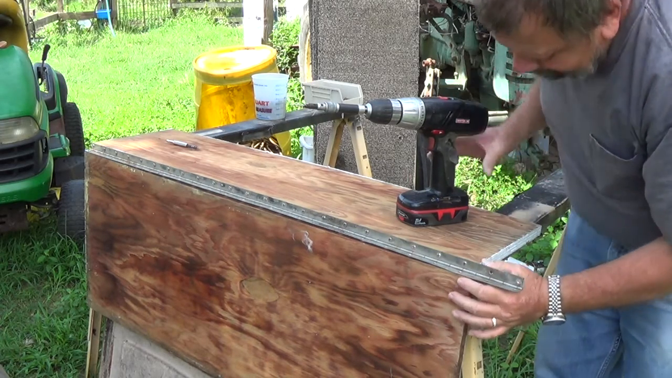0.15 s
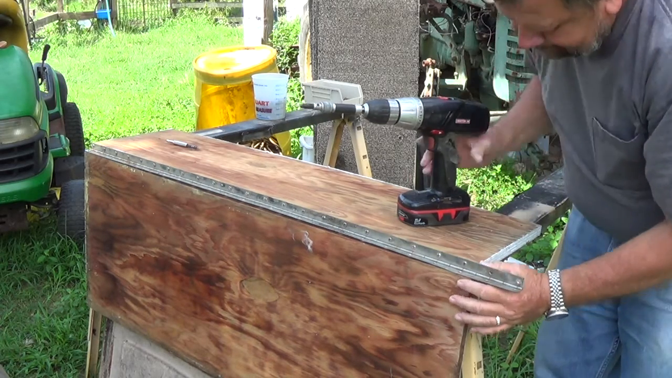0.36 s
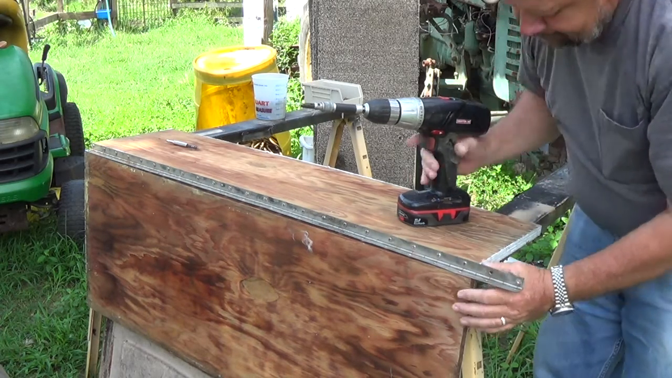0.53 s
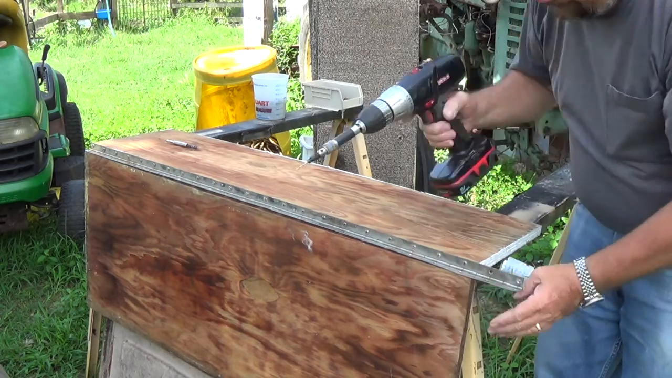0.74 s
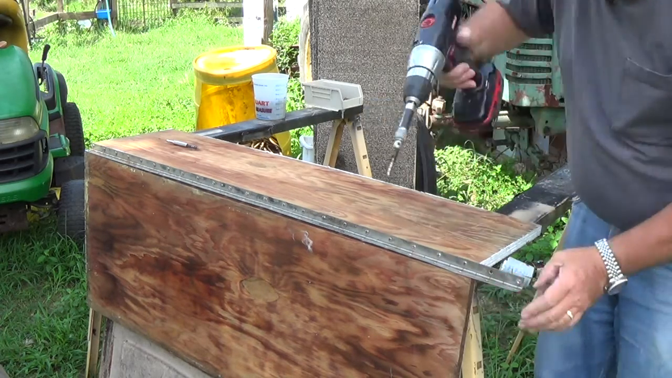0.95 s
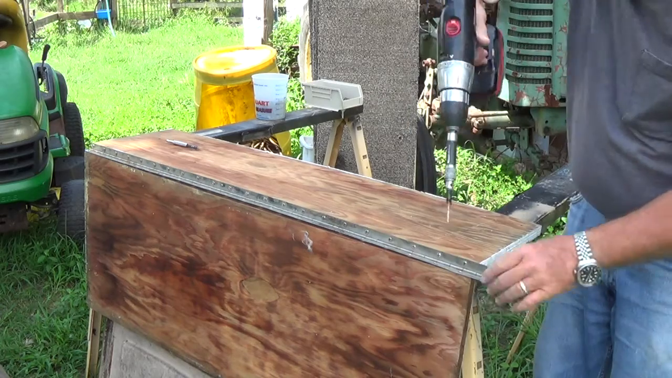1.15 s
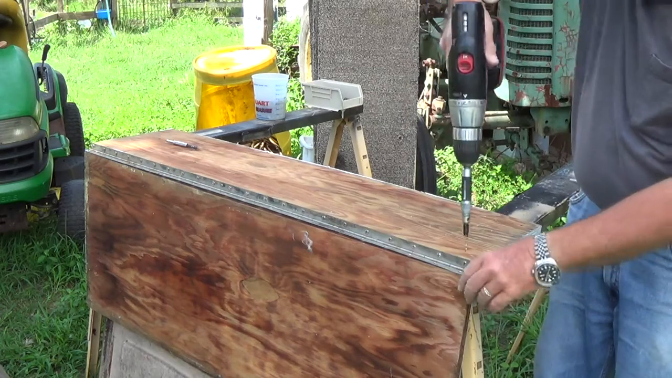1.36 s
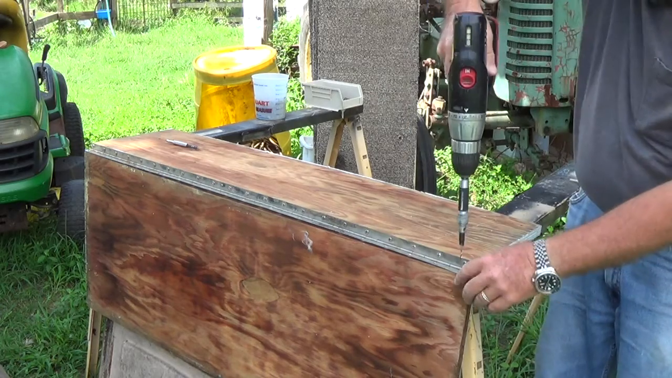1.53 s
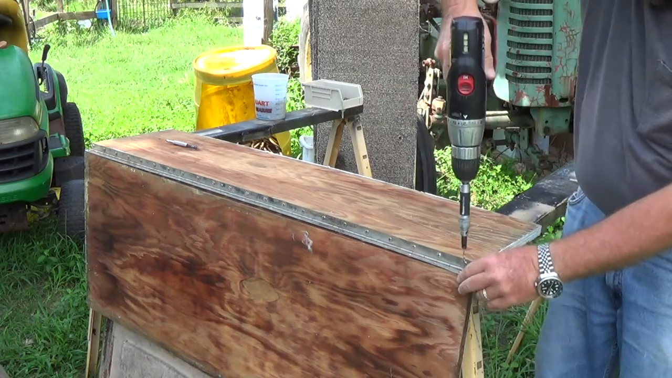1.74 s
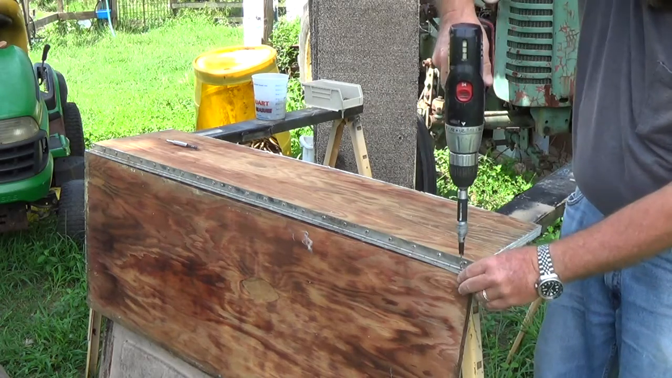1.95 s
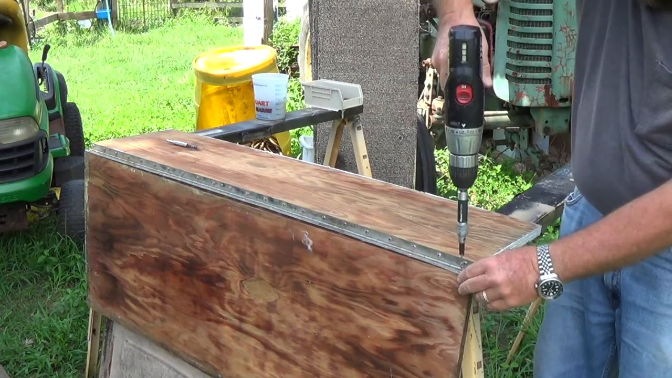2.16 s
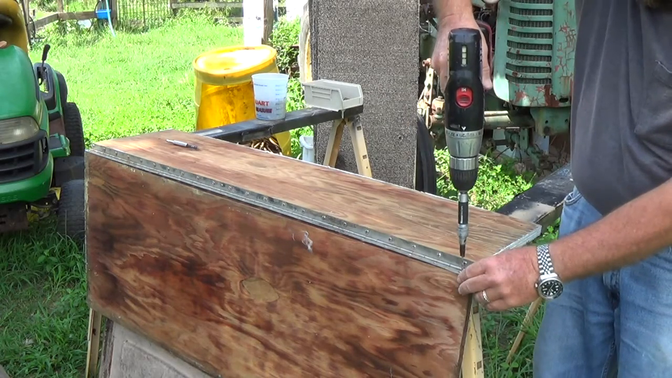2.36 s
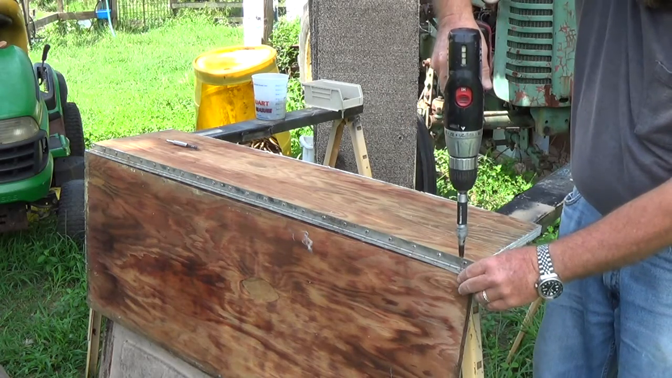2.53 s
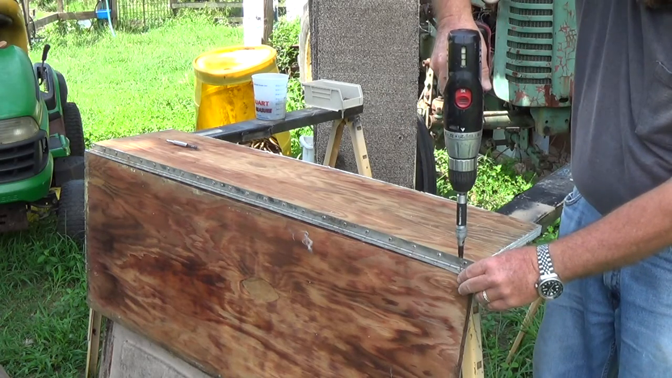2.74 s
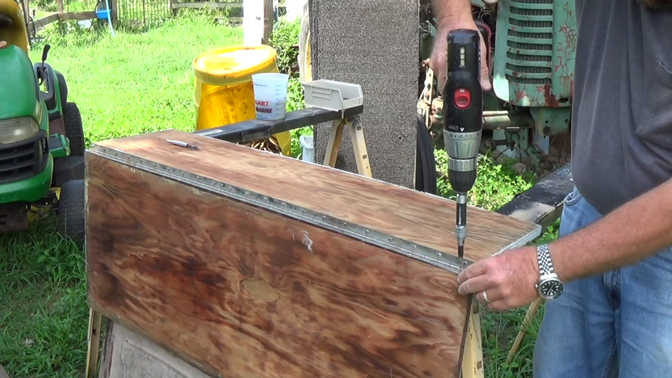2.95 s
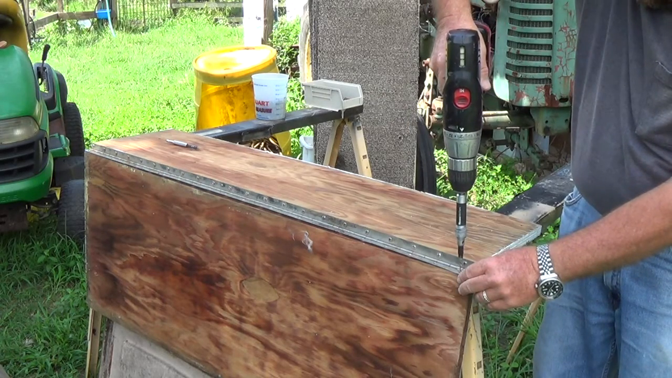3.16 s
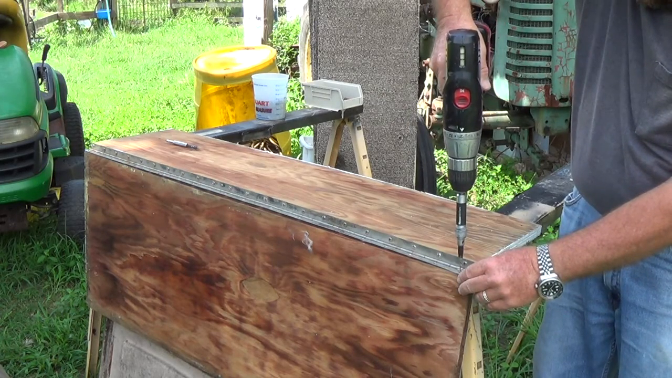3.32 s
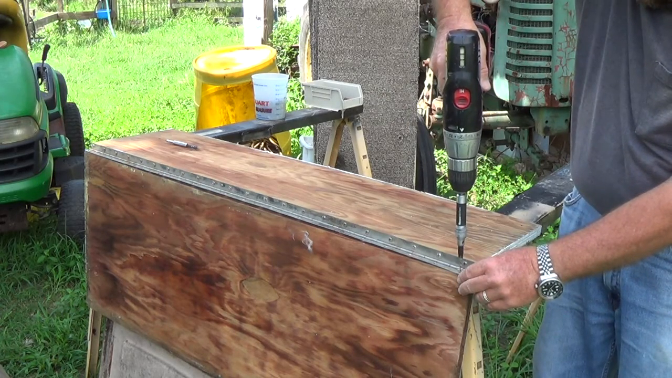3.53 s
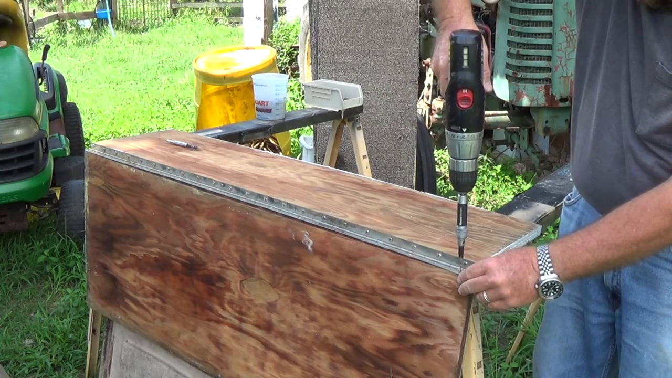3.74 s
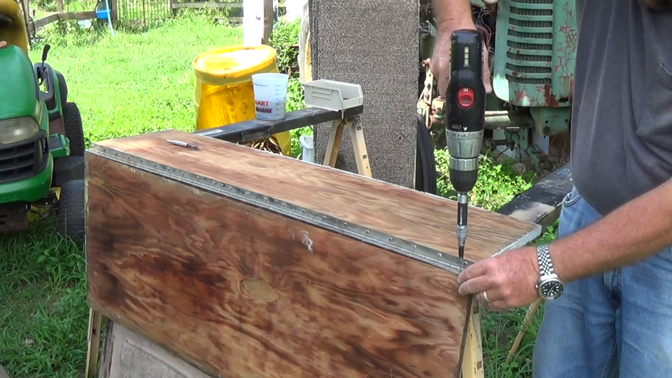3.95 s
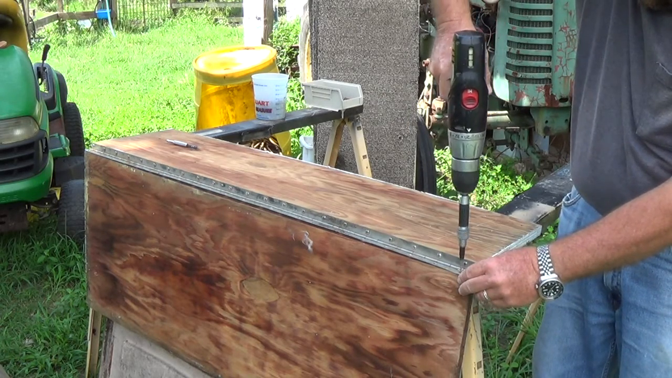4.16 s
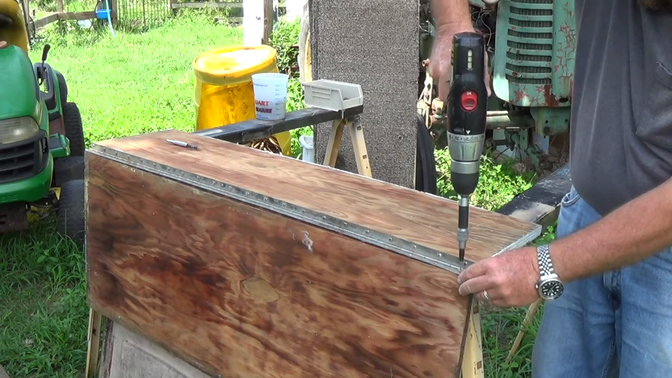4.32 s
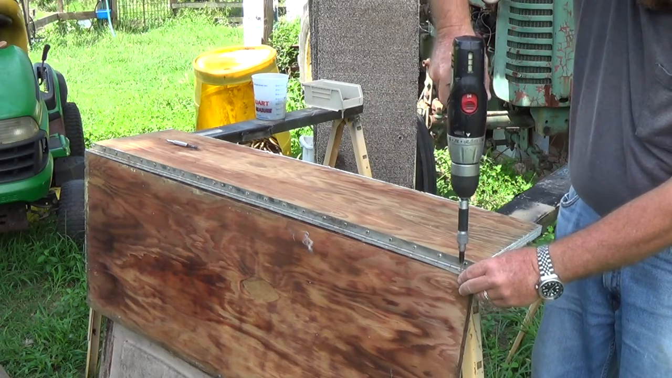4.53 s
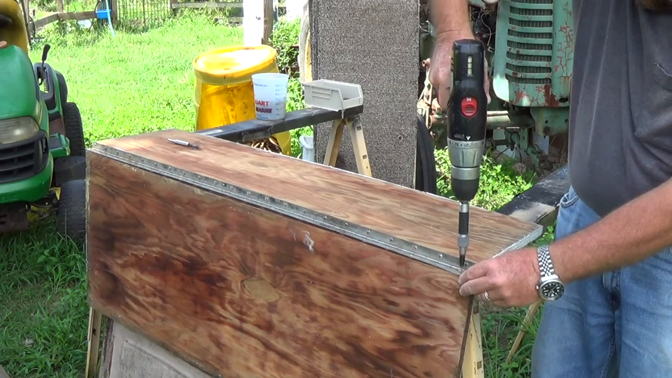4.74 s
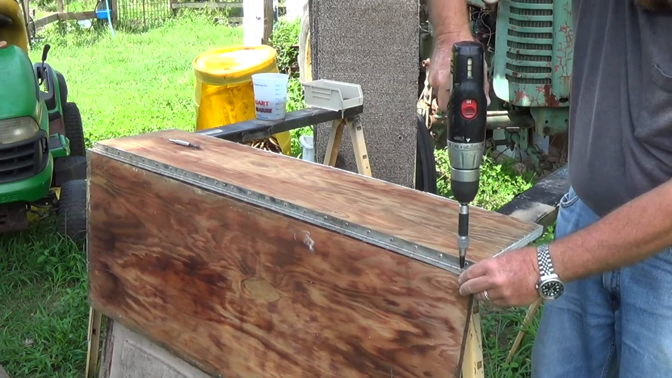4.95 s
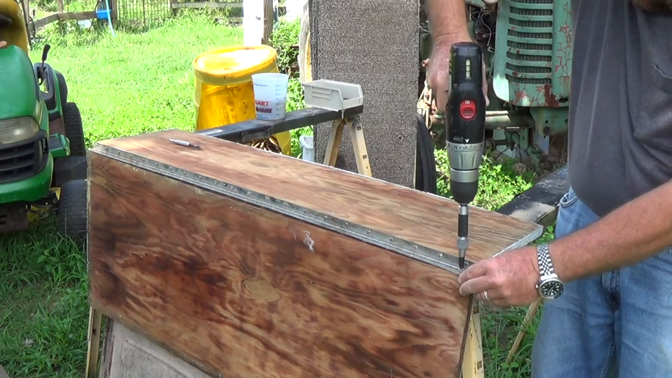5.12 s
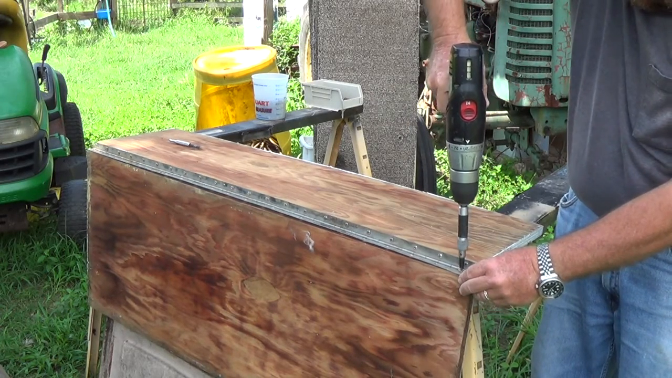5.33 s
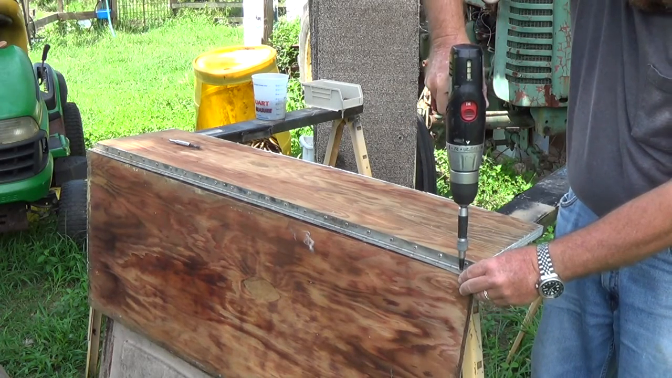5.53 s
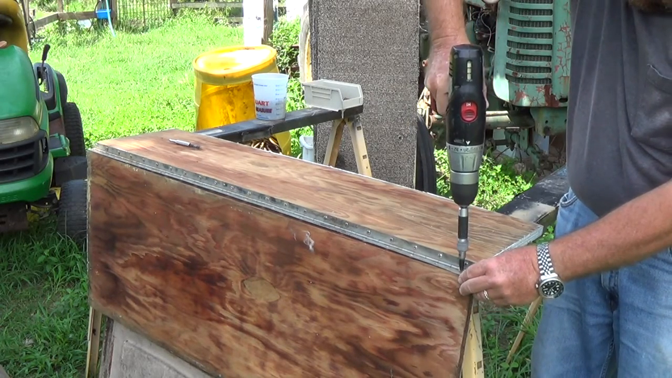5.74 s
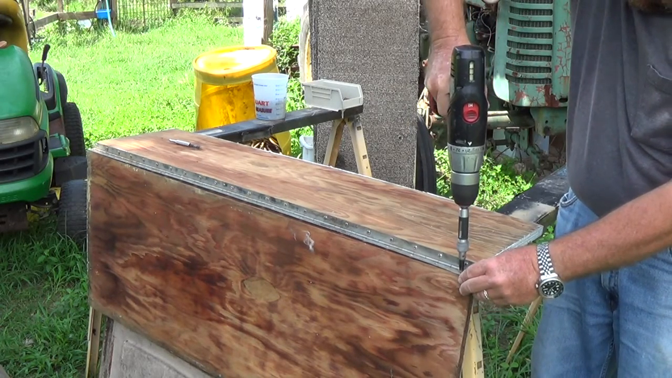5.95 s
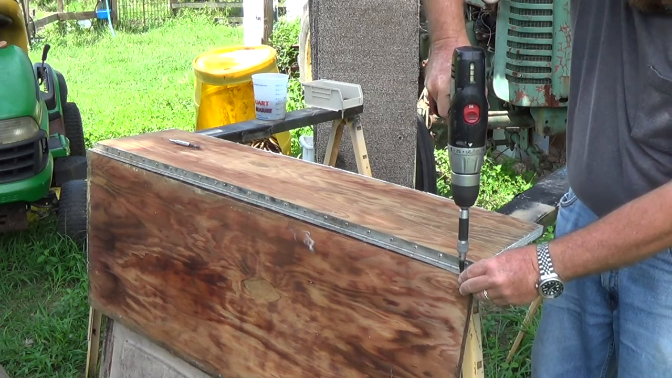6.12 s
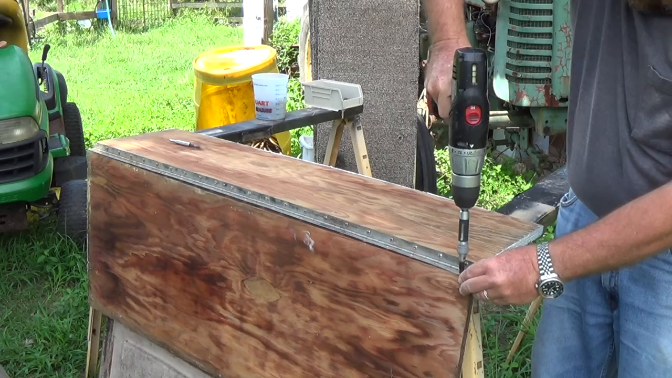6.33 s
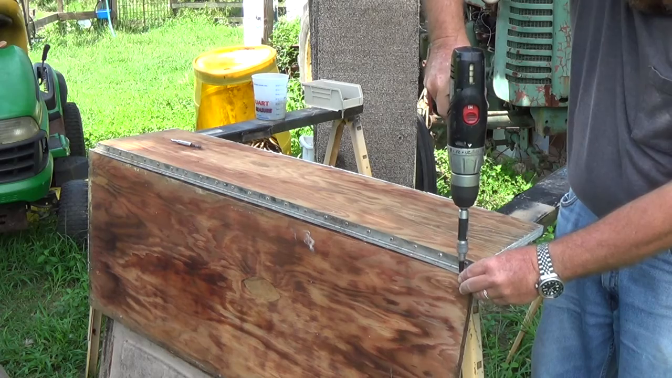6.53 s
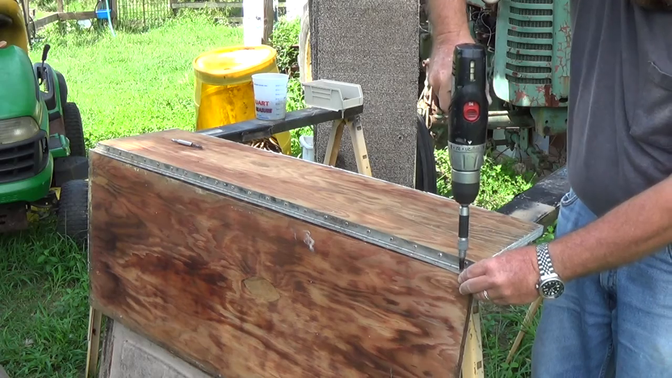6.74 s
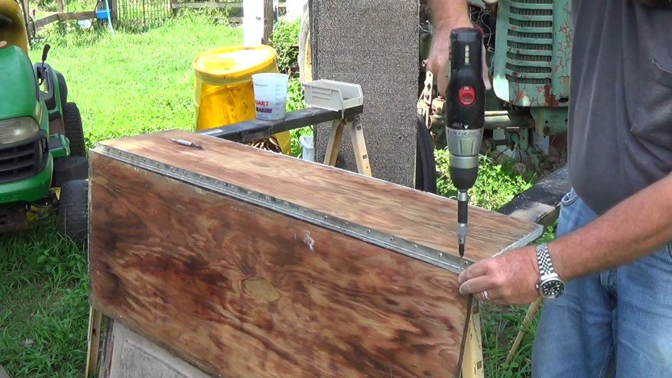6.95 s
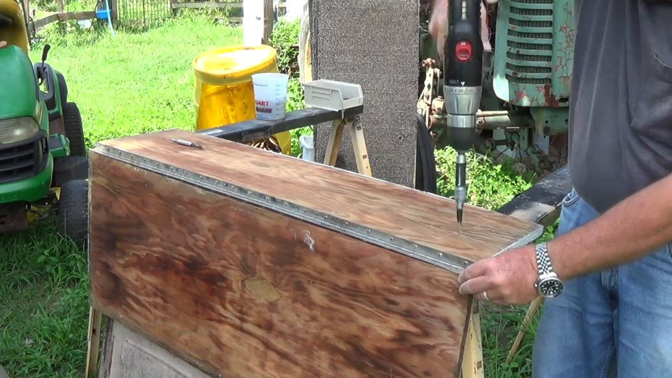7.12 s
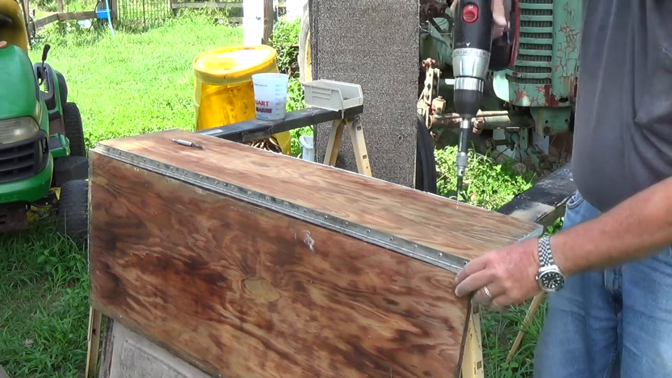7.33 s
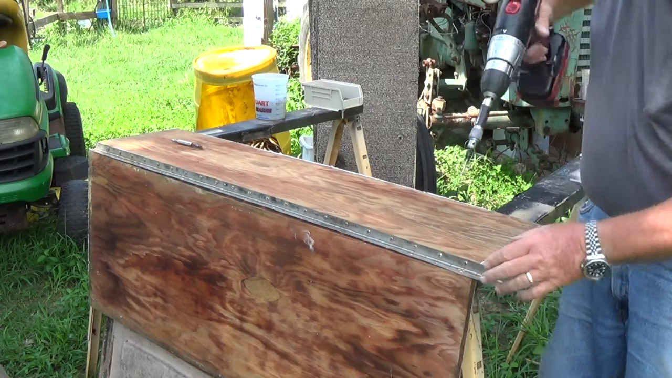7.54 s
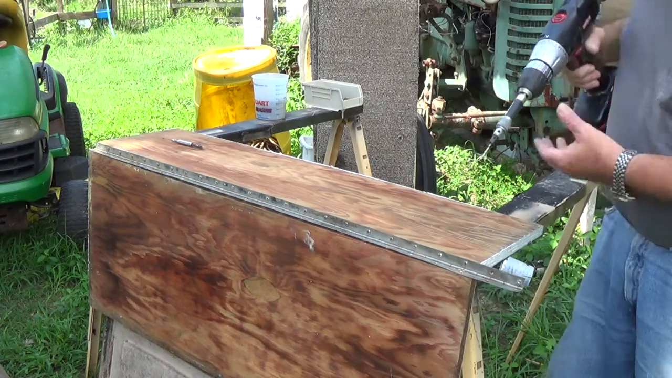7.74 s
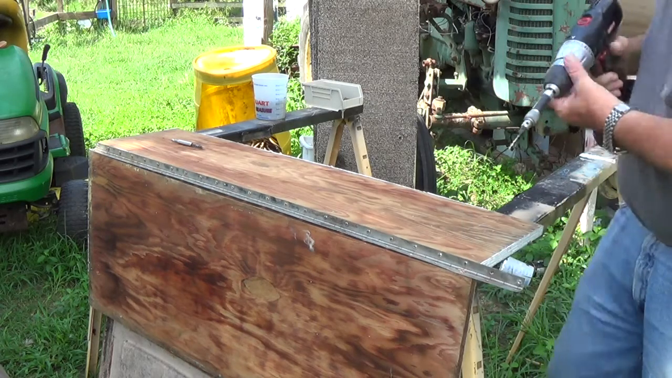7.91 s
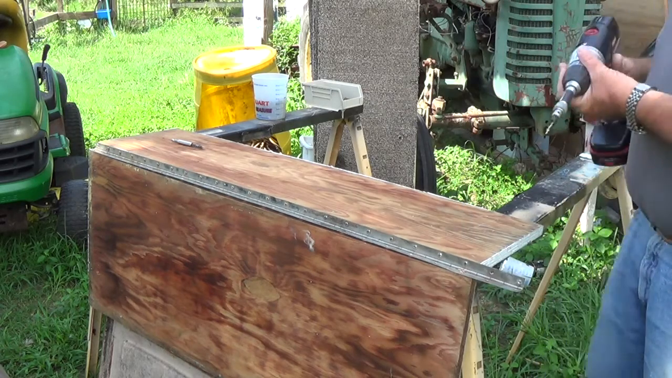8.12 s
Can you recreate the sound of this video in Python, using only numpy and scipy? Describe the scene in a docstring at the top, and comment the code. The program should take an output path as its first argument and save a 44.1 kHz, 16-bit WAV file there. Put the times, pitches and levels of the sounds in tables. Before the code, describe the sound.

A cordless drill bores through a steel hinge into wood, speeding up and stopping with a clack, with faint birds and insects outdoors.

```python
"""A cordless drill bores through a steel hinge into a plywood box, two metres from a camcorder in a yard.
Motor and gear tones follow the shaft speed, over gear rattle, brush hiss and the rumble of the board.
Trigger and brake set the housing ringing; hands tick on the work and sweep the chips off the bit.
Far from the microphone a wren and a second bird sing through the trees and an animal calls twice.
Katydids pulse throughout, over a bed of traffic and leaves."""
import sys
import numpy as np
from scipy import signal
from scipy.fft import rfft, irfft, next_fast_len
from scipy.io import wavfile
from scipy.ndimage import uniform_filter1d, map_coordinates

SR = 44100
rng = np.random.default_rng(int(sys.argv[2]) if len(sys.argv) > 2 else 0)


def wav_record(signal):
    """Record a signal, one row per channel, as 16-bit PCM in the file named by sys.argv[1]."""
    frames = np.transpose(np.atleast_2d(signal))
    bounded = np.clip(frames, -1, 1)
    # unit amplitude maps onto the largest positive 16-bit level
    quanta = np.round(bounded * 32767).astype(np.int16)
    wavfile.write(sys.argv[1], SR, quanta)


N = 365148
T = np.arange(N) / SR

# traffic and leaves: (frequency [Hz], relative level [dB])
YARD_SPECTRUM = [(15, -34.5), (25, -6.5), (118, -0.5), (250, -4.5), (588, -8.5), (1720, -14.5), (3440, -16),
                 (10000, -20), (10900, -25), (15000, -21)]
# one insect a row: (centre [Hz], width [Hz], pulse rate [Hz], time of one pulse [s], level [dB])
KATYDID_BANDS = [(10000, 840, 6.2, 2.95, -58.5), (9430, 460, 5.3, 2.93, -69), (9990, 320, 23, 3.3, -64)]
# the wren's phrase, note by note: (time in phrase [s], pitch [Hz], relative level [dB])
WREN_NOTES = [
    [(-.035, 3100, -6), (-.015, 2100, -11)],
    [(0, 2600, -4), (.015, 2500, -4), (.03, 1900, -8)],
    [(.065, 2980, -2), (.085, 3080, 0), (.097, 3500, -1.5), (.106, 4050, -2.5)],
    [(.14, 2470, -1), (.158, 2830, -0.5), (.17, 2930, 3)],
    [(.185, 2250, -4), (.2, 1765, -9), (.23, 1510, -12)],
]
# its repeats: (time [s], level [dB])
WREN_PHRASES = [(0.144, -51), (0.507, -48), (.873, -47.5), (1.243, -48.5)]
# hands and bit against hinge and board: (time [s], peak level [dB], centre [Hz])
HANDLING_TICKS = [(.249, -42, 3080), (.404, -36, 2780), (.546, -33.5, 2510), (.605, -41, 1790),
                  (0.669, -44, 3530), (2.313, -38.5, 750), (2.453, -44, 3110), (2.613, -46.5, 6000),
                  (3.555, -46, 3100), (3.67, -47, 1500), (3.782, -38, 2470), (3.909, -39.5, 3080),
                  (7.891, -28.5, 4860), (7.912, -34, 1584), (7.93, -34.5, 5870)]
# the second bird, note by note: (time [s], nominal pitch [Hz], level [dB])
WHISTLES = [
    [(2.08, 3010, -63), (2.2, 2900, -75)],
    [(3.35, 3150, -60), (3.39, 2940, -60)],
    [(3.4, 2890, -56), (3.44, 2440, -59)],
    [(3.44, 2300, -60), (3.49, 2820, -68)],
]
# the far animal: (time [s], length [s], nominal first pitch [Hz], nominal last pitch [Hz], level [dB])
FAR_CALLS = [(2.241, .07, 907, 970, -60), (3.451, 0.18, 833, 960, -53.5)]
# the trigger spring: (time [s], nominal pitch [Hz], level [dB])
SPRING_SQUEAK = [(3.95, 5750, -55), (3.965, 5390, -49), (3.98, 5270, -48.5)]
# trigger, brake and switch: (time [s], peak level [dB], brightness [dB/octave])
HOUSING_HITS = [(3.9813, -17.5, -2), (3.99, -16, 5), (7.09, -8.5, -5.5), (7.096, -13, 0), (8.232, -16.5, 0),
                (8.243, -29, -2.5), (8.2581, -6.5, -2.5), (8.263, -16.5, 7), (8.2681, -15, -0.5)]
# the struck drill housing: (frequency [Hz], relative level [dB], 60 dB decay time [s])
HOUSING_MODES = [(940, 0.5, 0.021), (1440, -2.5, 0.03), (1870, 1.5, 0.019), (2730, 3, 0.013),
                 (3350, 5.5, 0.017), (3880, 0, 0.024), (4540, 6.5, 0.0162), (6000, 8, 0.011),
                 (9930, -11, 0.0059), (12230, 4, 0.011)]
# trigger pulls: (time [s], speed gained [Hz], share in a straight ramp [0-1], ramp [s], lag of the rest [s])
TRIGGER_PULLS = [(3.977, 222.9, .5, .082, .155), (5.33, 92.05, .55, .055, .06)]
# the bit's load on the shaft: (time [s], speed lost [Hz])
LOAD_SAG = [(4.62, 0), (5.0, 6), (5.33, 7), (5.78, 5.5), (6.1, 8.5), (6.31, 12.5), (6.45, 10.5), (6.65, 5),
            (7.0, 0)]
# shaft hum, commutator and its upper companion: (frequency [multiples of shaft speed])
MOTOR_ORDERS = [1, 12, 15]
# their base levels as the load changes: (time [s], hum [dB], commutator [dB], companion [dB])
MOTOR_LEVELS = [(4.0, -61, -31.5, -57), (5.33, -56.5, -31, -44), (5.345, -54, -38, -48),
                (5.375, -50.5, -29, -44), (5.44, -52, -35, -42), (5.5, -48, -31, -45),
                (5.9, -46.5, -33, -53), (6.16, -52, -31, -39),(6.26, -51, -35, -33),
                (6.58, -59, -31.5, -53), (6.72, -45, -25, -50),
                (6.86, -46.5, -22, -39),(7.02, -63, -25, -33.5)]
# gear tones: (frequency [multiples of shaft speed])
GEAR_ORDERS = [4.27, 5, 6, 10.5, 10.88, 13.38, 24, 25, 26, 30, 34, 35, 40, 45, 46, 47, 61]
# their base levels, one tone a row: (part trigger [dB], cutting steel [dB], running free [dB])
GEAR_LEVELS = [(-54, -40, -35), (-44, -35, -39), (-41, -48, -43), (-52, -33, -61), (-57, -32, -45),
               (-50.5, -35, -60), (-49, -47, -39), (-49, -41, -39), (-49, -40, -44), (-58, -42, -47),
               (-52, -44, -44), (-60, -38.5, -43), (-64, -40.5, -44), (-58, -43, -47), (-41, -45, -48),
               (-60, -46, -46), (-47, -70, -70)]
# meshes with play, which sputter: (frequency [multiples of shaft speed])
LOOSE_ORDERS = [4.27, 10.88, 13.38]
# noise of the running drill: (time [s], gear rattle [dB], brush hiss [dB])
RUNNING_LEVELS = [(3.999, -41, -47.5), (4.07, -34.5, -34.5), (4.55, -29, -33), (5.33, -25.5, -29),
                  (5.39, -23, -25), (6.32, -21.5, -26), (6.45, -22, -26), (7.06, -24.5, -27.5),
                  (7.1, -22, -28)]
# gear rattle: (frequency [Hz], relative level [dB])
GEAR_SPECTRUM = [(180, -31), (300, -22.5), (588, -10), (802, -7.5), (1340, -1.5), (1750, -5), (2880, -5.5),
                 (3300, -2.5), (4090, -3), (5970, -8), (6830, -13.5), (7500, -15.5), (9750, -37),
                 (16500, -120)]
# brush hiss: (frequency [Hz], relative level [dB])
BRUSH_SPECTRUM = [(3530, -18.5), (6000, -5.5), (7200, -13), (7960, 3), (9320, -3), (10100, 0.5),
                  (11400, -3.5), (13100, 2), (14900, -4), (16200, -32)]
# plywood rumble: (frequency [Hz], relative level [dB])
BOARD_SPECTRUM = [(60, -27), (110, -3), (200, -4.5), (450, -2), (800, 2), (1500, -17)]
# skin on steel: (frequency [Hz], relative level [dB])
SKIN_SPECTRUM = [(600, -8), (4000, -6), (6500, -2.5), (9500, 0.5), (11500, -7.5), (15000, -18)]

MOTOR_ON_S, FULL_TRIGGER_S, THROUGH_S = RUNNING_LEVELS[0][0], 5.37, 6.55
RELEASE_S, BRAKE_S = 7.035, 7.09
DRILL_PAN_DB = [[-.6], [.6]]


def undb(db):
    return 10 ** (np.asarray(db) / 20)


def unit(x):
    return x / np.sqrt(np.mean(x ** 2))


def butter(x, order, hz, kind):
    return signal.sosfilt(signal.butter(order, hz, kind, fs=SR, output="sos"), x)


def band(x, hz, width):
    return unit(butter(x, 2, [hz - width / 2, hz + width / 2], "band"))


def colour(x, points):
    """Filter by (frequency [Hz], level [dB]) points; rms 1."""
    hz, db = np.transpose(points)
    size = next_fast_len(N)
    log_hz = np.log(np.arange(size // 2 + 1) * SR / size + 1)
    return unit(irfft(rfft(x, size) * undb(np.interp(log_hz, np.log(hz), db)), size)[:N])


def walk(rate):
    """Random levels held 1 / rate s and smoothed twice; spread near 1."""
    k = int(SR / rate)
    steps = np.repeat(rng.standard_normal(N // k + 1), k)
    return 1.35 * uniform_filter1d(uniform_filter1d(steps, k), k)[:N]


def grit(spread_db):
    """Noise in which some samples are much larger: dense small impacts."""
    return rng.standard_normal(N) * undb(spread_db * rng.exponential(size=N))


def swell(start, attack, hold, release):
    """Gain 0-1: straight attack, hold, straight release."""
    return np.interp(T, np.cumsum([start, attack, hold, release]), [0, 1, 1, 0])


def echo(x, t60, edge_hz, kind, order):
    """Scattered reflections, unrelated left and right, high- or low-passed."""
    t = T[:int(t60 * SR)]
    tail = rng.standard_normal((2, len(t))) * np.exp(-np.log(1000) * t / t60) * (t > .004)
    tail = butter(tail, order, edge_hz, kind)
    return signal.fftconvolve(x[None], tail / np.sqrt(np.sum(tail[0] ** 2)), axes=1)[:, :N]


def add_note(out, rows, partials, start=0., db=0., tuning=0.98):
    """Add a glide through (time [s], pitch [Hz], level [dB]) rows, its pitch scaled by tuning."""
    s, hz, row_db = np.transpose(rows)
    i, j = int((s[0] + start) * SR), int((s[-1] + start) * SR)
    t = T[i:j] - start
    phase = 2 * np.pi * tuning * np.cumsum(np.interp(t, s, hz)) / SR
    fade = np.clip(np.minimum(t - s[0], s[-1] - t) / 0.0013, 0, 1)
    gain = fade * undb(db + np.interp(t, s, row_db))
    out[i:j] += gain * sum(g * np.sin((k + 1) * phase) for k, g in enumerate(partials))


def yard():
    """The bed: traffic and leaves, narrower in the bass, and a low wavering hum."""
    mid, side = (colour(rng.standard_normal(N), YARD_SPECTRUM) for _ in range(2))
    side = butter(side, 1, 150, "high") * np.array([[0.43], [-0.43]])
    air = (mid + side) * undb(-55 + .7 * walk(1.5))
    hum = undb(-65.5 + 1.5 * walk(1.73)) * band(rng.standard_normal(N), hz=116.8, width=8.4)
    return air + hum


def camcorder_whine(hz=15734, db=-65.5):
    """The camcorder's own thin, steady tone, right at the microphone."""
    return np.sqrt(2) * undb(db) * np.sin(2 * np.pi * hz * T)


def katydids():
    """Raspy bands that pulse around the yard, each insect at its own pace and place."""
    out = 0
    for hz, width, rate, at, db in KATYDID_BANDS:
        cycles = rate * (T - at) + 0.027 * walk(1.5)
        pulse = np.clip(0.12 + np.cos(2 * np.pi * cycles), .25, 1)
        pan = 1 + 0.21 * rng.standard_normal() * np.array([[1], [-1]])
        out += undb(db + 0.96 * walk(1.9)) * pulse * band(grit(2.0), hz, width) * pan
    return out


def wren():
    """Far off, one phrase of pure glides sung four times, each note slightly retuned."""
    out = np.zeros(N)
    for start, db in WREN_PHRASES:
        for note in WREN_NOTES:
            add_note(out, note, [1], start, db, tuning=1 + 0.0095 * rng.standard_normal())
    return out


def handling():
    """Hands and bit touch hinge and board: short dull bursts, each with a broad peak."""
    out, t = np.zeros(N), T[:SR // 20]
    for s, db, hz in HANDLING_TICKS:
        burst = rng.standard_normal(len(t)) * np.exp(-t / 0.0064) * np.minimum(t / 0.0011, 1)
        hit = band(burst, hz, 0.34 * hz) + 1.3 * band(burst, 2310, 3700)
        i = int(s * SR)
        out[i:i + len(t)] += undb(db) * hit / abs(hit).max()
    return out


def far_engine():
    """A distant engine's drone swells and fades."""
    gain = undb(-61) * swell(start=0.56, attack=0.71, hold=1.1, release=1)
    return gain * band(rng.standard_normal(N), hz=83, width=6.6)


def second_bird():
    """Faint, scattered pure whistles."""
    out = np.zeros(N)
    for note in WHISTLES:
        add_note(out, note, [1])
    return out


def far_animal():
    """Two distant calls, loudest at the octave; the swell and most of the pitch rise come early."""
    out = np.zeros(N)
    for s, length, first_hz, last_hz, db in FAR_CALLS:
        crest = (0.42 * length, .25 * first_hz + .75 * last_hz, 0)
        add_note(out, [(0, first_hz, -11), crest, (length, last_hz, -4)], [.55, 1, .15], s, db)
    return out


def trigger_spring():
    """The spring gives a short falling squeak as the trigger goes in."""
    out = np.zeros(N)
    add_note(out, SPRING_SQUEAK, [1, .5])
    return out


def clacks():
    """Each clack rings the housing modes in a new mix, with a crack that grows with brightness."""
    out, t = np.zeros(N + SR), T[:SR // 8]
    for s, db, tilt_db in HOUSING_HITS:
        ring = 0
        for hz, mode_db, t60 in HOUSING_MODES:
            gain = undb(mode_db + tilt_db * np.log2(hz / 2000) + 3.0 * rng.standard_normal())
            ring += gain * np.exp(-np.log(1000) * t / t60) * np.sin(2 * np.pi * (hz * t + rng.random()))
        crack = band(rng.standard_normal(len(t)), 6150, 11100) * np.exp(-t / 0.006)
        hit = (ring / abs(ring).max() + undb(-17 + 2 * tilt_db) * crack) * np.minimum(t / 0.0013, 1)
        i = int(s * SR)
        out[i:i + len(t)] += undb(db) * hit / abs(hit).max()
    return out[:N]


def shaft_speed(coast_hz_per_s=330):
    """Turns a second: each pull brings a ramp and a slow lag; load and release take speed away."""
    hz = -np.interp(T, *np.transpose(LOAD_SAG)) - coast_hz_per_s * np.clip(T - RELEASE_S, 0, .2)
    for s, gain_hz, share, ramp_s, lag_s in TRIGGER_PULLS:
        t = np.maximum(T - s, 0)
        hz += gain_hz * (share * np.minimum(t / ramp_s, 1) + (1 - share) * (1 - np.exp(-t / lag_s)))
    return np.maximum(hz, 1)


def drill_whine(hz, turns, spin_db_per_octave=3, coast_db_per_s=116):
    """Motor and gear tones locked to the shaft, growing with speed up to the first pull's plateau."""
    run = slice(int(MOTOR_ON_S * SR), int(BRAKE_S * SR))
    t, hz = T[run], hz[run]
    angle = 2 * np.pi * (turns + .0005 * walk(45))[run]
    speed_change = np.clip(abs(uniform_filter1d(np.gradient(np.log(hz)), size=1000)) * SR, 0, 3)
    s, *levels = np.transpose(MOTOR_LEVELS)
    tones = sum(undb(np.interp(t, s, db) + 1.35 * walk(25)[run]) * np.sin(order * angle)
                for order, db in zip(MOTOR_ORDERS, levels))
    stage_s = [FULL_TRIGGER_S - .03, FULL_TRIGGER_S + 0.027, THROUGH_S - .08, THROUGH_S + 0.051]
    low_gear, commutator = GEAR_ORDERS[1], MOTOR_ORDERS[1]
    for order, (slow, cutting, free) in zip(GEAR_ORDERS, GEAR_LEVELS):
        loose = order in LOOSE_ORDERS
        db = np.interp(t, stage_s, [slow, cutting, cutting, free])
        # changes of speed load the low gear and weaken the loose and high tones
        db += speed_change * (order == low_gear)
        db -= speed_change * (9 if loose else 0.4 * order * (order > commutator))
        flutter = walk(110) if loose else undb(2.0 * walk(10))
        tones += undb(db) * flutter[run] * np.sin(order * angle)
    spin_db = spin_db_per_octave * np.log2(np.minimum(hz / TRIGGER_PULLS[0][1], 1))
    coast_db = coast_db_per_s * np.maximum(t - RELEASE_S, 0)
    onset = np.clip((t - t[0]) / 0.55, .6, 1) * np.minimum((t - t[0]) / .018, 1) ** 2
    out = np.zeros(N)
    out[run] = np.sqrt(2) * tones * undb(spin_db - coast_db) * onset
    return out


def gear_rattle(turns, flaws, db):
    """Tooth impacts throb with the chuck; loose teeth knock the gear case, which rings."""
    throb = 1 + 0.12 * np.sin(2 * np.pi * (turns / 5.3 + 0.33 * walk(7)))
    rattle = colour(grit(1.8) * throb + .12 * flaws, GEAR_SPECTRUM) * undb(db + 0.68 * walk(25))
    case_ring = band(band(grit(3.3), hz=1340, width=340), hz=1340, width=340)
    return rattle + case_ring * throb * undb(db - 13 + 2.2 * walk(45))


def brush_hiss(turns, flaws, db):
    """The brushes arc, their hiss swelling once a turn."""
    arcs = 1 + 0.135 * np.sin(2 * np.pi * turns)
    return colour(grit(0.85) * arcs + .5 * flaws, BRUSH_SPECTRUM) * undb(db + .7 * walk(12))


def board_rumble(gear_db, lift_db_per_s=8):
    """The plywood shakes with the gears, judders at breakthrough and quietens as the bit is drawn out."""
    rumble = undb(gear_db - 22.5 - lift_db_per_s * np.maximum(T - THROUGH_S, 0))
    judder = undb(-37.5) * swell(start=6.29, attack=.04, hold=.11, release=.1)
    return colour(grit(1.55), BOARD_SPECTRUM) * (rumble + judder) * undb(2.2 * walk(12))


def drill(brake_db_per_s=650):
    """Two metres off, just right of centre: whine, rattle, hiss and rumble until the brake holds."""
    s, *levels = np.transpose(RUNNING_LEVELS)
    gear_db, brush_db = (np.interp(T, s, db) - brake_db_per_s * np.maximum(T - s[-1], 0) for db in levels)
    hz = shaft_speed()
    turns = np.cumsum(hz) / SR
    # the same surface flaws come round once a turn, slowly wearing into others
    wear = np.clip(2.14 * (T - MOTOR_ON_S), 0, 7)
    flaws = map_coordinates(rng.standard_normal((8, 256)), [wear, turns % 1 * 255], order=1)
    body = gear_rattle(turns, flaws, gear_db) + brush_hiss(turns, flaws, brush_db)
    # the board and the drill's low end radiate more towards the right
    board = board_rumble(gear_db) * undb([[-2.2], [2.2]])
    body += drill_whine(hz, turns)
    low_side = butter(body, 2, 513, "low") * np.array([[-0.29], [0.29]])
    onset = np.clip((T - MOTOR_ON_S) / 0.0099, 0, 1)
    return onset * (body * undb(DRILL_PAN_DB) + low_side + board)


def scene():
    """From the microphone: near work reflects off box and sheds; birds come mostly through the trees."""
    near = drill() + (clacks() + handling() + trigger_spring() + chip_sweep()) * undb(DRILL_PAN_DB)
    sheds = undb(-14) * echo(near.mean(axis=0), t60=.15, edge_hz=11300, kind="low", order=4)
    birds, calls = wren() + second_bird(), far_animal()
    far = (birds + calls) * undb([[0.5], [-3.5]])
    trees = undb(6.5) * echo(birds + undb(-4) * calls, t60=1.1, edge_hz=2700, kind="high", order=2)
    return near + sheds + far + trees + katydids() + yard() + far_engine() + camcorder_whine()


def chip_sweep(start=7.75, attack=0.13, hold=.15, fade_db_per_s=65):
    """Fingers sweep the chips off the bit: a soft, grainy hiss of skin on steel."""
    rise = np.clip((T - start) / attack, 0, 1)
    fade_db = fade_db_per_s * np.maximum(T - start - attack - hold, 0)
    return rise * undb(-46 - fade_db + 1.1 * walk(30)) * colour(grit(1.2), SKIN_SPECTRUM)


def record(dry):
    """The camcorder cuts steeply above 15.9 kHz."""
    return signal.sosfilt(signal.ellip(14, .2, 100, 15900, fs=SR, output="sos"), dry)


dry = scene()
out = record(dry)
wav_record(out)
```